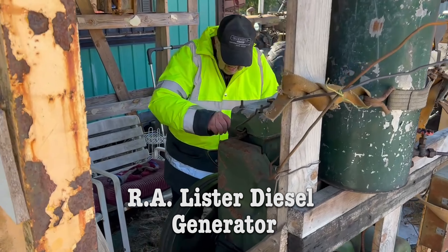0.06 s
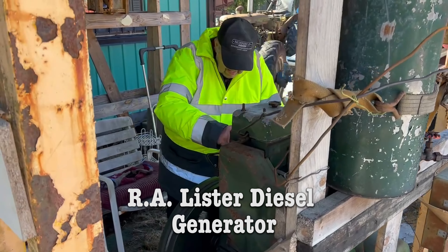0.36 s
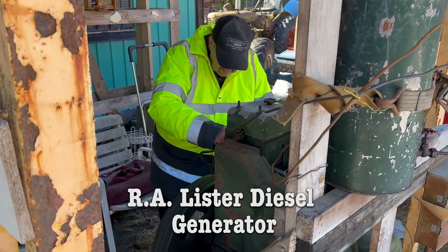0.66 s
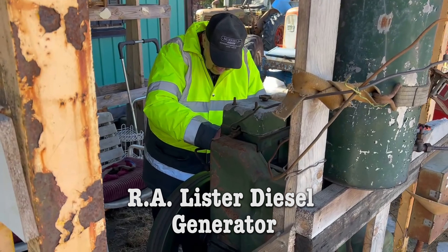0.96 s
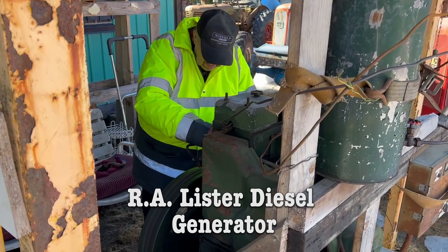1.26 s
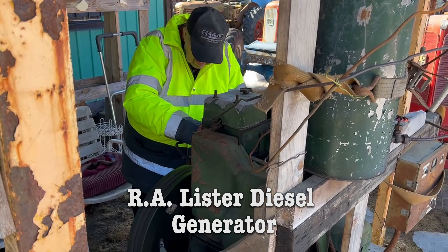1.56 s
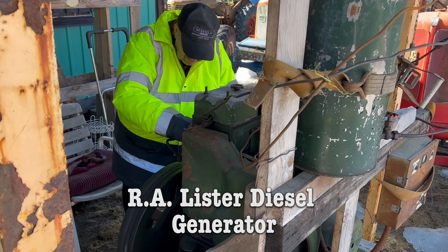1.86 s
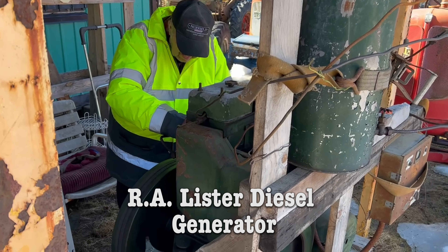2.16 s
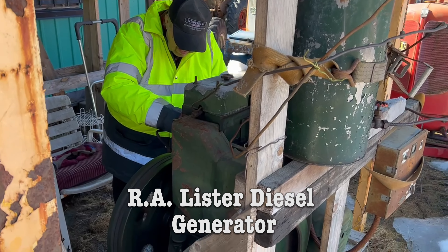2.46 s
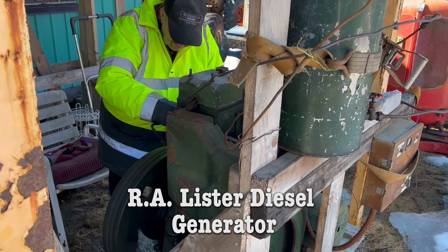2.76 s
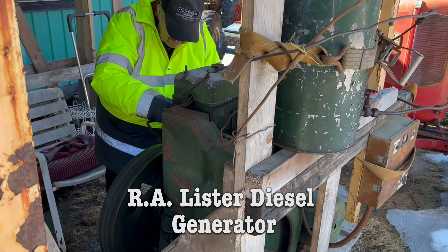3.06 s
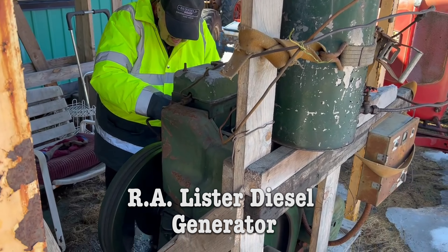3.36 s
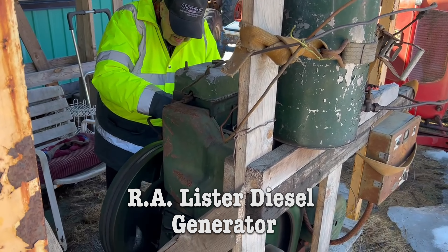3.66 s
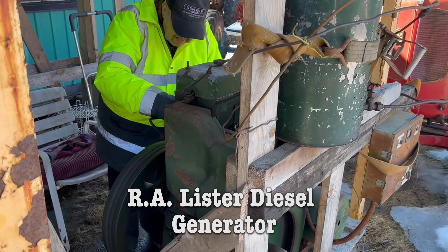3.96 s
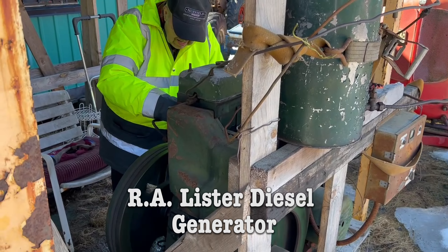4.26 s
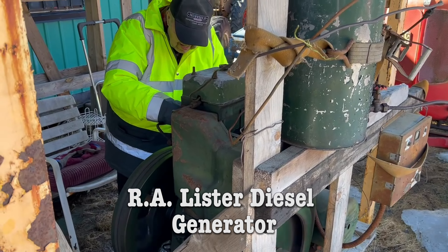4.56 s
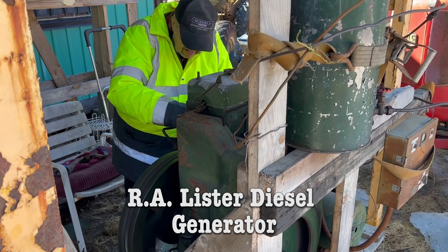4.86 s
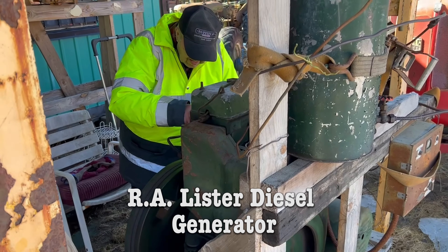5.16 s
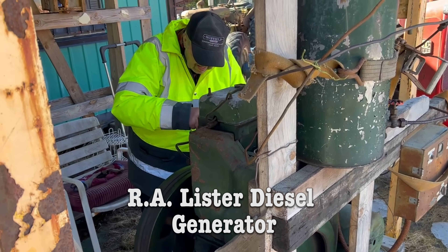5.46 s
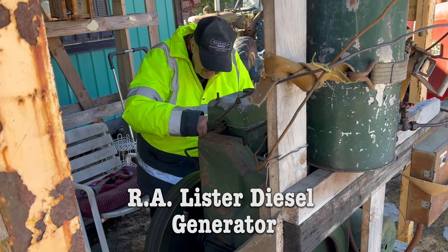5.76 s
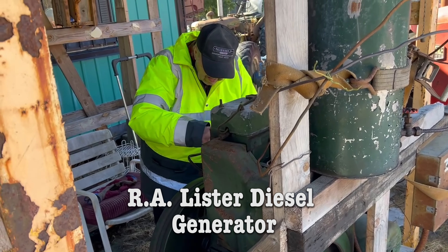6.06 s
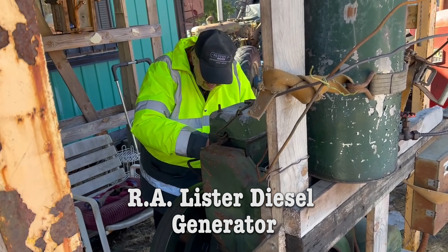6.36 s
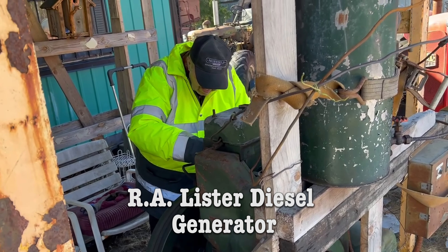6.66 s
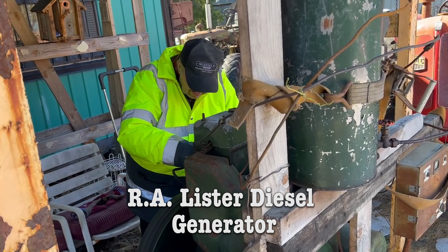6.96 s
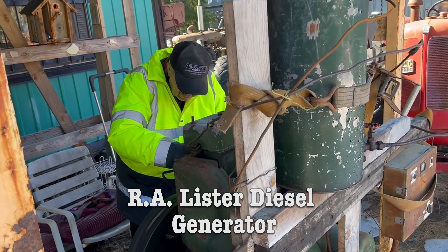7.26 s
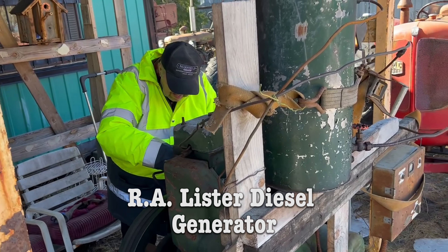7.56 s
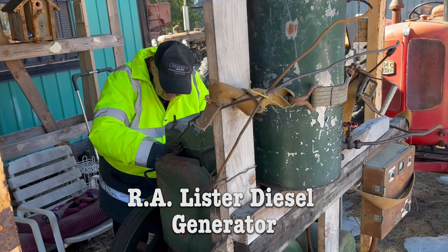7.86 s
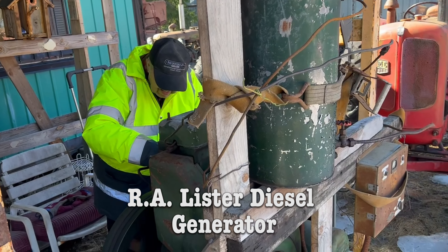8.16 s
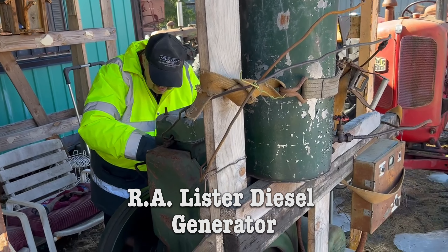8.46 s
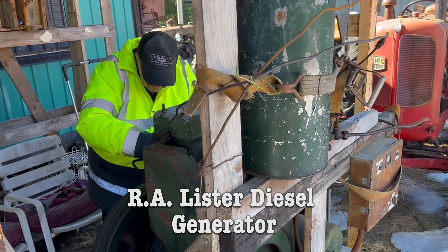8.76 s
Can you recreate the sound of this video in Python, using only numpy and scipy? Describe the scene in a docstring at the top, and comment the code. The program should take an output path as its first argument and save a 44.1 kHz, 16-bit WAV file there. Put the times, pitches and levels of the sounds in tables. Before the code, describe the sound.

An old single-cylinder diesel engine is already running close to a stereo microphone under an open farmyard shed. It knocks evenly, four to five firings a second, with ringing iron, clacking valves, light ticks and a pulsing hum. A loose part chatters at first. Then the speed sags slightly and a low thump grows heavier toward the end. The boards give a brief echo over a faint outdoor rush.

```python
"""An old single-cylinder four-stroke diesel under an open farmyard shed, close to a stereo microphone pair.
It is already running at about 540 rpm. Each cycle the injection pump ticks, the iron block knocks, a panel
hums, the exhaust puffs, the rockers rub and two valves clack shut; the shed's boards answer briefly.
In the first seconds, at the highest speed, a slack rocker chatters. Then the governor lets the speed
sag slowly to about 500 rpm, and the thump on the bed grows heavier toward the end."""
import sys
import numpy as np
from scipy import signal
from scipy.fft import rfft, irfft, next_fast_len
from scipy.io import wavfile
from scipy.ndimage import uniform_filter1d

SR = 44100
rng = np.random.default_rng(int(sys.argv[2]) if len(sys.argv) > 2 else 0)


def persist_wave(psi):
    """Save psi, clipped to +-1, as 16-bit WAV."""
    counts = np.round(np.clip(psi, -1, 1) * 32767).astype(np.int16)
    wavfile.write(sys.argv[1], SR, np.atleast_2d(counts).T)


N = 397782
RATED_RPM, RING_SCATTER_DB = 540, 2

# each firing of the cylinder: time_s, knock_db, crack_db, hum_db, thump_db
FIRINGS = [(-0.0846, -22, -46, -20.5, -21), (0.1358, -22, -24, -20, -24), (0.3552, -19.5, -36, -16.5, -22),
           (0.5742, -21.5, -42, -18, -31), (0.7936, -21, -40, -18.5, -27), (1.0128, -21.5, -18.5, -20, -28),
           (1.2317, -21.5, -38, -20.5, -20), (1.4491, -22, -26, -21.5, -15), (1.667, -22, -33, -20, -15),
           (1.8845, -23, -34, -23.5, -18), (2.1021, -23, -27, -16.5, -19), (2.3187, -24, -17, -20.5, -23),
           (2.5362, -22, -22, -19.5, -30), (2.7539, -24.5, -38, -17, -22), (2.9712, -22.5, -18.5, -18, -30),
           (3.1909, -23, -24, -19, -15), (3.412, -22.5, -41, -18.5, -23),
           (3.6305, -22, -15.5, -24.5, -16.5), (3.8504, -22, -19.5, -19.5, -16.5),
           (4.0713, -22, -25, -18, -19), (4.2925, -22, -26, -19, -22), (4.515, -22.5, -24.5, -25, -19),
           (4.7383, -23.5, -25, -20.5, -20), (4.962, -24, -21, -28, -18), (5.187, -21.5, -20, -30, -16),
           (5.4127, -22, -41, -20, -24), (5.639, -20.5, -18.5, -27, -15), (5.8666, -22.5, -26, -22, -16.5),
           (6.094, -21.5, -24.5, -24, -19.5), (6.3236, -22, -23.5, -22.5, -15),
           (6.553, -21, -25, -22.5, -14), (6.783, -22, -41, -22, -11), (7.013, -21.5, -25, -23, -14),
           (7.2433, -22, -41, -25.5, -14.5), (7.4737, -21, -23.5, -23, -13),
           (7.7058, -21.5, -23, -23.5, -10.5), (7.9397, -21.5, -26.5, -21, -11.5),
           (8.174, -22.5, -34, -21.5, -11.5), (8.4105, -22.5, -33, -21.5, -10),
           (8.649, -24, -32, -21.5, -12), (8.8903, -21, -29, -20.5, -10.5)]
def crank(share):
    """The times at which each cycle, from one firing to the next, reaches this share of its length."""
    fired = np.transpose(FIRINGS)[0]
    lengths = np.diff(fired)
    return fired + share * np.append(lengths, lengths[-1])


def rpm_lost():
    """How far each cycle runs below the rated speed, at two turns a cycle."""
    return RATED_RPM - 2 * 60 / uniform_filter1d(crank(1) - crank(0), size=3)


def force(rated_db, db_per_rpm_lost, scatter_db):
    """A part's level in each cycle: it follows the speed and scatters a little."""
    return rated_db + db_per_rpm_lost * rpm_lost() + scatter_db * rng.standard_normal(len(FIRINGS))


# blows on the block through firing and power stroke: cycle_share, level_db, rise_s, t60_s
KNOCKS = [(.004, 1, 0.00085, 0.042), (.024, 0, 0.00039, .045), (.056, -3, 0.00099, .045),
          (.086, -5, .0006, .08), (.13, -1.5, 0.0042, 0.38), (.16, -9.5, .0008, .05),
          (.23, -12.5, 0.00087, 0.039)]
# the unloaded piston rocks at the top of its exhaust stroke: cycle_share, level_db, rise_s, t60_s
PISTON_SLAPS = [(0.491, -7, 0.0014, 0.095), (.54, -12, 0.00085, 0.32)]
# the block's tone colour: frequency_hz, level_db
BLOCK_SPECTRUM = [(200, -29), (400, -12), (600, 3.5), (900, -1), (1300, -1), (1900, -4), (2800, -7.5),
                  (4500, -14.5), (6000, -22), (9000, -21), (15500, -75)]
def block_knock(knock_db, slap_db):
    """Firing blows and piston slap sound through the iron block."""
    knocks = strokes(KNOCKS, knock_db - 3.5, alike=0.61, scatter_db=0.77)
    slaps = strokes(PISTON_SLAPS, slap_db, alike=0.2, scatter_db=0.5)
    return body(knocks + slaps, BLOCK_SPECTRUM)


# the ring of the cast iron: pitch_hz, level_db, t60_s
BLOCK_MODES = [(452.5, 1, 0.079), (548, 7.5, 0.075), (618, 5, 0.11), (690, 3, 0.057), (746, 8, 0.07),
               (878, 1, 0.093), (987, 3.5, 0.11), (1010, -8, 0.1), (1183, -5.5, 0.084), (1348, -0.5, 0.063),
               (1467, -6.5, 0.09), (1560, -1.5, 0.097), (1657, -5.5, 0.16), (1705, -16, 0.12),
               (1820, -8, 0.14), (1954, -3, 0.1), (2112, 0.5, 0.12), (2187, -4, 0.075), (2425, -15, 0.12),
               (2690, -7, 0.072), (2880, -12, 0.11), (3010, -7.5, 0.086), (3350, -9.5, 0.09),
               (3860, -7, 0.066), (4444, 0.5, 0.036)]
def iron_ring(blows, cycle_db, ring_db=0.87, soft_rise_s=0.00089, detune=.002, jitter_s=.00012):
    """Each stroke favours other modes of the iron and shifts them a little; slow contacts ring less."""
    track, t = np.zeros(N), np.arange(SR // 5) / SR
    hz, mode_db, t60 = np.transpose(BLOCK_MODES)
    weights = amp(mode_db) / np.linalg.norm(amp(mode_db)) * np.sqrt(2)
    tints, drifts = rng.standard_normal((2, len(cycle_db), len(hz)))
    for share, db, rise, _ in blows:
        envelopes = swell(t, rise, t60[:, None])
        phase = rng.random((len(hz), 1))
        hardness = 1 / np.hypot(1, rise / soft_rise_s)
        for s, level_db, tint, drift in zip(crank(share), cycle_db, tints, drifts):
            late = jitter_s * rng.standard_normal()
            turns = (hz * (1 + detune * drift))[:, None] * (t - late) + phase
            modes = envelopes * np.sin((2 * np.pi * turns).astype(np.float32))
            gains = weights * amp(db + level_db + ring_db + RING_SCATTER_DB * tint)
            add(track, s, hardness * gains @ modes)
    return track


# the piston's heavy landings in soft firings: start_s, level_db
DULL_CLANKS = [(.358, -18), (.577, -31), (.799, -19), (2.105, -25), (2.757, -14), (2.771, -14),
               (3.415, -22), (4.297, -21), (7.942, -21)]
def dull_clanks(top_hz=990, t60_share=0.45):
    """A slow, heavy contact rings the loaded block briefly, mostly in its low modes."""
    track, t = np.zeros(N), np.arange(SR // 5) / SR
    hz, mode_db, t60 = np.transpose(BLOCK_MODES)
    weights = amp(mode_db) / np.hypot(1, (hz / top_hz) ** 3)
    envelopes = swell(t, 0.0009, t60_share * t60[:, None])
    for s, db in DULL_CLANKS:
        modes = envelopes * np.sin(2 * np.pi * (hz[:, None] * t + rng.random((len(hz), 1))))
        gains = weights * amp(RING_SCATTER_DB * rng.standard_normal(len(hz)))
        add(track, s, np.sqrt(2) * amp(db) * (gains / np.linalg.norm(gains)) @ modes)
    return track


# cracks of ignition: cycle_share, level_db, rise_s, t60_s
CRACKS = [(.003, -1.5, 0.001, 0.098), (.024, -4, 0.00037, 0.065)]
# the cylinder head's tone colour: frequency_hz, level_db
HEAD_SPECTRUM = [(400, -40), (1000, -19), (1800, 9), (3000, 7), (4600, 1.5), (6000, -5.5), (8000, -17),
                 (12500, -14), (15500, -38)]
# its resonances: pitch_hz, width_hz, boost_db
HEAD_MODES = [(1649, 11, 14.4), (1711, 29, 19), (1830, 40, 11), (2820, 45, 6), (4520, 84, 11)]
def ignition_crack(crack_db):
    """The fuel ignites with a sharp crack in the cylinder head."""
    return body(strokes(CRACKS, crack_db, alike=0.62, scatter_db=0.5), HEAD_SPECTRUM, HEAD_MODES)


# panel and frame modes: cycle_share, pitch_hz, level_db, rise_s, t60_s
PANEL_MODES = [(0.0452, 237.3, 7.6, 0.014, 0.59), (0.0943, 293, 1, 0.018, 0.26),
               (0.1288, 174, -9, 0.026, 0.41), (0.0289, 340, -10, 0.014, 0.26),
               (0.855, 310, -3.5, 0.0086, 0.25), (.88, 174, -8.5, 0.0066, 0.34),
               (.86, 220, 1.5, 0.0095, 0.12)]
def panel_hum(hum_db):
    """Panel and frame hum as each cycle strikes them, a little flatter as the speed sags."""
    return tones(PANEL_MODES, hum_db, detune=.002, scatter_db=0.3, sag_per_rpm=0.00028)


# modes of the engine bed: cycle_share, pitch_hz, level_db, rise_s, t60_s
BED_MODES = [(.008, 243.3, 10, 0.0039, 0.039), (.016, 288, -8, 0.0024, .06), (.02, 462, -10.5, .001, 0.046),
             (.02, 606, -10, 0.0012, .05), (.02, 760, -9, .001, .045)]
def bed_thump(thump_db):
    """The firing jolts the bed, which rings briefly."""
    return tones(BED_MODES, thump_db, detune=0.0088, scatter_db=1.5)


# exhaust and intake pulses: cycle_share, level_db, pitch_hz, half_length_s
PUFFS = [(.025, -1, 85, 0.0063), (.13, -1, 68, 0.0076), (.308, 8, 56, 0.0055), (.408, 7.5, 58.3, .017),
         (.618, 2.5, 73, .013), (.79, -5, 57.6, 0.0067)]
# their slow drift: time_s, level_db
PUFF_DRIFT = [(0, -27.5), (.9, -26.5), (1.7, -28), (2.8, -28), (4.25, -32), (4.7, -33.5), (7.0, -31.5),
              (8.7, -35.5)]
def gas_puffs():
    """Exhaust and intake make soft pressure pulses, only a swing or two long."""
    track, t = np.zeros(N), np.arange(-SR // 10, SR // 10) / SR
    cycle_db = np.interp(crank(0), *np.transpose(PUFF_DRIFT))
    for share, db, hz, half_length in PUFFS:
        envelope = np.exp(-(t / half_length) ** 2)
        pitches = hz * (1 + .015 * rng.standard_normal(len(cycle_db)))
        for s, level_db, pitch in zip(crank(share), cycle_db, pitches):
            add(track, s + t[0], amp(db + level_db) * envelope * np.cos(2 * np.pi * pitch * t))
    return track


# pump and needle ticks: cycle_share, level_db, rise_s, t60_s
INJECTION_TICKS = [(-.13, -19, .001, 0.032), (-.043, 5.5, 0.00089, 0.064), (-.029, 9.5, .0005, .03),
                   (-.015, 10.5, 0.00038, 0.019)]
# the injector's tone colour: frequency_hz, level_db
INJECTOR_SPECTRUM = [(300, -26), (620, 21), (850, -11), (1700, -6), (2500, -1.5), (2900, -16), (5000, -18),
                     (9000, -25), (15500, -55)]
# its resonances: pitch_hz, width_hz, boost_db
INJECTOR_MODES = [(1920, 72, 10), (2590, 120, 10)]
def injector_ticks():
    """The injection pump takes up and the injector needle chatters just before the firing."""
    cycle_db = force(-33, db_per_rpm_lost=0.083, scatter_db=1)
    ticks = strokes(INJECTION_TICKS, cycle_db, alike=0.88, scatter_db=1.0)
    return body(ticks, INJECTOR_SPECTRUM, INJECTOR_MODES)


# valve gear contacts: cycle_share, level_db, rise_s, t60_s
VALVE_CLACKS = [(-.025, 4.5, 0.0034, 0.16), (.479, 14.5, 0.001, 0.034), (.497, 10, 0.0022, 0.093),
                (.535, 2, 0.003, 0.1), (.748, 13, 0.0011, 0.039), (.762, 11, 0.002, 0.066)]
# the valves' tone colour: frequency_hz, level_db
VALVE_SPECTRUM = [(500, 10), (1300, 4.5), (2000, 3.5), (3000, 5), (4500, 5.5), (5600, 0), (7000, 2.5),
                  (8500, -3), (10000, -2.5), (12500, -1.5), (15500, -14)]
# their resonances: pitch_hz, width_hz, boost_db
VALVE_MODES = [(2410, 47, 3.4), (3990, 34, 5.6), (4530, 65, 8.9), (5250, 69, 7.3)]
def valve_clacks(gear_db):
    """Each valve seats with a sharp click and a short shudder."""
    return body(strokes(VALVE_CLACKS, gear_db, alike=0.13, scatter_db=0.36), VALVE_SPECTRUM, VALVE_MODES)


# valve and spring modes: cycle_share, pitch_hz, level_db, rise_s, t60_s
VALVE_PINGS = [(.476, 6530, 0, 0.00096, 0.036), (.476, 6760, 3, 0.0011, 0.032),
               (.49, 2560, 4.5, 0.0026, 0.073), (.49, 762, 9.5, .003, 0.074), (.5, 1673, -1.5, 0.0022, .12),
               (.75, 4360, 6.5, .0006, 0.024), (.755, 5095, 2.5, .0018, 0.059),
               (.765, 3490, -4.5, .001, 0.075), (.772, 568.5, 7, 0.0034, 0.2),
               (.772, 1154, 1.5, 0.0013, 0.059), (.85, 1973, 2.5, .001, 0.054)]
def valve_pings(gear_db):
    """Valves and springs ping as they seat."""
    return tones(VALVE_PINGS, gear_db, detune=0.0083, scatter_db=RING_SCATTER_DB)


# rubs of the rockers: cycle_share, level_db, rise_s, t60_s
ROCKER_RUBS = [(.1, 13.5, 0.016, 0.11), (.195, 10, 0.0053, 0.074), (.44, -11.5, 0.009, 0.18),
               (.65, 1.5, 0.0052, 0.2), (.7, 7, 0.0063, 0.11)]
# their tone colour: frequency_hz, level_db
ROCKER_SPECTRUM = [(500, -12), (1500, 2), (3200, -7), (4600, 1), (5800, -6.5), (7800, 0), (10000, -8),
                   (12500, -6), (15500, -20)]
# their resonances: pitch_hz, width_hz, boost_db
ROCKER_MODES = [(4620, 100, 9.5), (6670, 240, 4.5)]
def rocker_rubs(gear_db):
    """Dry rockers rub while the valves move."""
    rubs = strokes(ROCKER_RUBS, gear_db, alike=0.026, scatter_db=1.8)
    return body(rubs, ROCKER_SPECTRUM, ROCKER_MODES)


# squeaks of the rocker tips: cycle_share, level_db, pitch_hz, half_length_s, glide_share
ROCKER_SQUEAKS = [(0.251, -10, 7650, 0.012, .04), (0.687, -4.5, 4650, 0.0091, 0.044),
                  (0.705, -3, 7460, 0.009, .05), (0.765, -6, 4266, 0.0045, -0.24)]
def rocker_squeaks(gear_db, scatter_db=1.5, waver=.028):
    """The rocker tips slide on the valve stems with a short, unsteady gliding squeak."""
    track, t = np.zeros(N), np.arange(-SR // 20, SR // 20) / SR
    for share, db, hz, half_length, glide in ROCKER_SQUEAKS:
        envelope = np.exp(-(t / half_length) ** 2)
        for s, level_db in zip(crank(share), gear_db):
            slip = np.interp(t, np.linspace(t[0], t[-1], 50), rng.standard_normal(50))
            pitch = hz * (1 + glide * np.tanh(t / half_length) / 2 + waver * slip)
            gain = amp(db + level_db + scatter_db * rng.standard_normal())
            add(track, s + t[0], gain * envelope * np.sin(2 * np.pi * np.cumsum(pitch) / SR))
    return track


# chatter after the exhaust valve shuts, at the highest speed: start_s, level_db
CHATTERS = [(.692, -23), (.911, -28.5), (1.131, -21.5), (1.348, -25.5), (1.569, -23), (1.786, -27),
            (2.002, -25), (2.22, -38), (2.43, -32)]
# its tone colour: frequency_hz, level_db
CHATTER_SPECTRUM = [(500, -21), (1200, 8), (1900, 5), (2700, 5), (4500, -4), (6000, -23), (15500, -38)]
def rocker_chatter(gap_s=.005, loss_db=3):
    """A slack rocker bounces four times, ever more weakly, at uneven gaps."""
    track, t = np.zeros((2, N)), np.arange(SR // 10) / SR
    envelope = swell(t, 0.0005, 0.032)
    for s, db in CHATTERS:
        gaps = gap_s * rng.uniform(.5, 1.5, size=4)
        for bounce, late in enumerate(np.cumsum(gaps) - gaps[0]):
            add(track, s + late, amp(db - loss_db * bounce) * envelope * rng.standard_normal((2, len(t))))
    return body(track, CHATTER_SPECTRUM)


# rattles of the frame: cycle_share, level_db, rise_s, t60_s
FRAME_RATTLES = [(.02, -23, 0.0069, 0.46), (.5, -24.5, 0.0021, 0.13), (.785, -27.5, 0.0035, 0.33),
                 (.88, -26.5, 0.01, 0.55)]
# its tone colour: frequency_hz, level_db
FRAME_SPECTRUM = [(100, -27), (160, -1), (240, 3), (330, 4), (400, -12), (580, -8), (760, -7),
                  (1000, -11.5), (1400, -18), (2000, -14.5), (4000, -39), (12000, -61)]
# its resonances: pitch_hz, width_hz, boost_db
FRAME_MODES = [(356, 96, 3.5), (449, 4.7, 14), (584, 33, 3.4), (900, 3.5, 3.4), (1031, 28, 8.7),
               (1157, 42, 6.5)]
def frame_rattle():
    """The loose frame rattles at the same crank angles in every cycle."""
    rattles = strokes(FRAME_RATTLES, np.zeros(len(FIRINGS)), alike=0.092, scatter_db=1.24)
    return body(rattles, FRAME_SPECTRUM, FRAME_MODES)


# the echo under the shed: frequency_hz, t60_s
SHED_DECAY = [(200, 0.33), (2000, 0.23), (5000, 0.37), (10000, 0.021)]
def shed_echo(sound):
    """The boards' short answer, dying fastest in the high treble."""
    hz, t, noise = signal.stft(rng.standard_normal((2, SR // 2)), SR, nperseg=256)
    decay = np.exp(-np.log(1000) * t / along(SHED_DECAY, hz)[:, None])
    tail = signal.istft(noise * decay, SR, nperseg=256)[1]
    return signal.fftconvolve(sound, tail / np.linalg.norm(tail[0]), axes=1)[:, :N]


# the farmyard behind the engine: frequency_hz, level_db
YARD_SPECTRUM = [(20, -37), (45, -7.5), (100, -11), (300, -8), (1000, -19.5), (4000, -35), (9000, -42.5),
                 (14000, -39), (15800, -77)]
def yard_ambience():
    """A steady, low rush from the quiet yard."""
    return body(rng.standard_normal((2, N)), YARD_SPECTRUM)


def strokes(rows, cycle_db, alike, scatter_db):
    """Mid and side bursts on the crank; the same parts meet, so a share `alike` of their power repeats."""
    track, t = np.zeros((2, N)), np.arange(SR // 5) / SR
    for share, db, rise, t60 in rows:
        same = rng.standard_normal((2, len(t)))
        envelope = swell(t, rise, t60)
        for s, level_db in zip(crank(share), cycle_db):
            contact = np.sqrt(alike) * same + np.sqrt(1 - alike) * rng.standard_normal(same.shape)
            add(track, s, amp(db + level_db + scatter_db * rng.standard_normal()) * envelope * contact)
    return track


def tones(rows, cycle_db, detune, scatter_db, sag_per_rpm=0):
    """Single modes set ringing once a cycle, a little differently every time."""
    track, t = np.zeros(N), np.arange(SR // 2) / SR
    for share, hz, db, rise, t60 in rows:
        envelope = swell(t, rise, t60)
        pitches = hz * (1 - sag_per_rpm * rpm_lost())
        draws = rng.standard_normal((len(cycle_db), 2))
        for s, level_db, pitch, (tint, drift) in zip(crank(share), cycle_db, pitches, draws):
            ring = envelope * np.sin(2 * np.pi * pitch * (1 + detune * drift) * t)
            add(track, s, amp(db + level_db + scatter_db * tint) * ring)
    return np.sqrt(2) * track


# width at the microphone pair: frequency_hz, side_minus_mid_db
STEREO_WIDTH = [(60, -13.5), (250, -47), (400, -15), (700, -14), (1290, -0.5), (2380, -10.5), (4400, -5.5),
                (7000, -19), (10000, 19), (12000, -7)]
def body(drive, spectrum, modes=()):
    """Mid and side drive through a ringing body of unit power gain, to left and right."""
    def response(f):
        gain = amp(along(spectrum, f)) + 0j
        for hz, band, db in modes:
            gain *= 1 + (amp(db) - 1) * 1j * f * band / (hz * hz - f * f + 1j * f * band)
        width = amp(along(STEREO_WIDTH, f))
        power = np.mean(abs(gain) ** 2) * (1 + width ** 2)
        return gain / np.sqrt(power) * np.array([np.ones_like(f), width])
    mid, side = filtered(drive, response)
    return np.array([mid + side, mid - side])


def spread(mid):
    """Each partial reaches the two microphones a little out of step."""
    side = filtered(mid, lambda f: 1j * amp(along(STEREO_WIDTH, f)))
    return np.array([mid + side, mid - side])


def swell(t, rise, t60):
    """A quick rise and an exponential decay."""
    return (1 - np.exp(-t / rise)) * np.exp(-np.log(1000) * t / t60)


def amp(db):
    return 10 ** (np.asarray(db) / 20)


def along(points, hz):
    """Interpolate (frequency_hz, value) points on a log axis."""
    f, values = np.transpose(points)
    return np.interp(np.log(hz + 1), np.log(f + 1), values)


def filtered(x, response):
    """Pass x through a complex frequency response."""
    size = next_fast_len(N + SR // 2)
    return irfft(rfft(x, size) * response(np.fft.rfftfreq(size, 1 / SR)), size)[..., :N]


def add(track, s, sound):
    """Mix a sound into a track from time s."""
    start = round(s * SR)
    a, b = max(start, 0), min(start + sound.shape[-1], N)
    if b > a:
        track[..., a:b] += sound[..., a - start:b - start]


def scene():
    """The engine close by, the shed's boards around it and the quiet yard beyond."""
    _, knock_db, crack_db, hum_db, thump_db = np.transpose(FIRINGS)
    slap_db = force(-23, db_per_rpm_lost=-0.27, scatter_db=1.6)
    gear_db = force(-39.5, db_per_rpm_lost=-0.025, scatter_db=1)
    metal = block_knock(knock_db, slap_db) + ignition_crack(crack_db) + injector_ticks()
    metal += valve_clacks(gear_db) + rocker_rubs(gear_db) + frame_rattle()
    ringing = iron_ring(KNOCKS, knock_db) + iron_ring(PISTON_SLAPS, slap_db) + dull_clanks()
    ringing += valve_pings(gear_db) + rocker_squeaks(gear_db)
    metal += spread(ringing) + rocker_chatter()
    low_end = panel_hum(hum_db) + bed_thump(thump_db) + gas_puffs()
    yard = amp(-34.5) * yard_ambience()
    return metal + low_end + amp(-15.5) * shed_echo(metal) + yard


# balance of the microphone pair: frequency_hz, left_minus_right_db
MIC_BALANCE = [(60, .2), (170, 0.83), (240, 1.2), (300, 0.082), (700, 2.5), (1290, 1), (4400, 2.8),
               (8000, 0.23)]
def record(dry, low_cut_hz=40, top_hz=15800):
    """The left microphone faces the engine a little more; deep bass and the highest treble are lost."""
    def response(f):
        balance = amp(np.outer([.5, -.5], along(MIC_BALANCE, f)))
        passband = f ** 4 / np.hypot(f ** 4, low_cut_hz ** 4) * (f < top_hz)
        return balance * passband
    return filtered(dry, response)


dry = scene()
out = record(dry)
persist_wave(out)
```